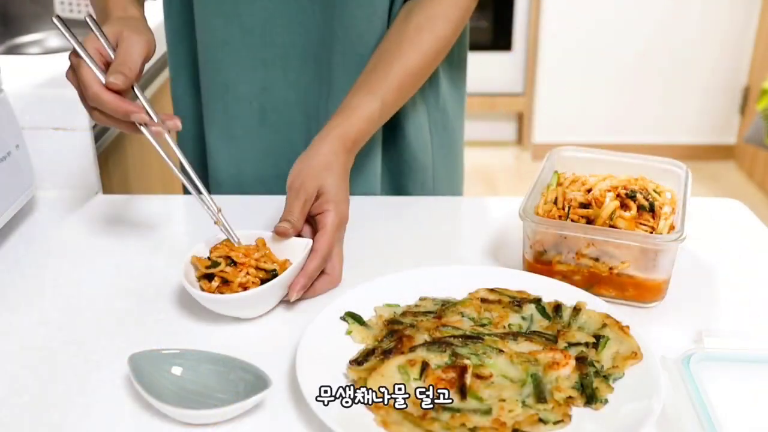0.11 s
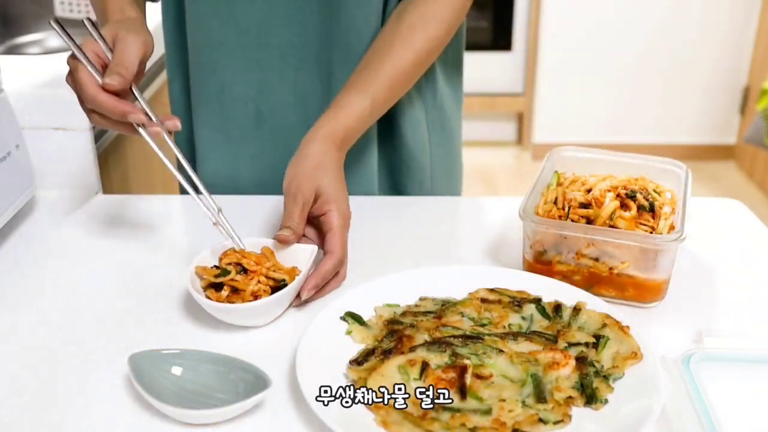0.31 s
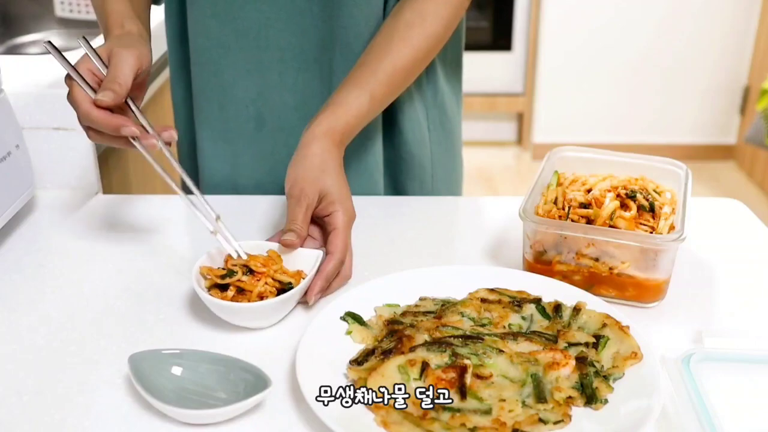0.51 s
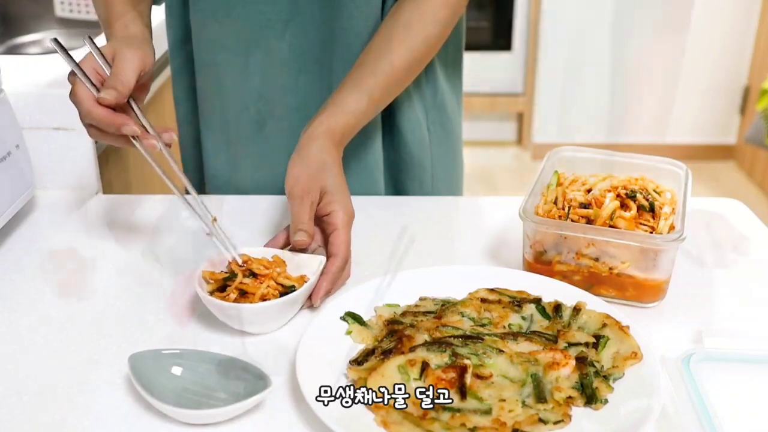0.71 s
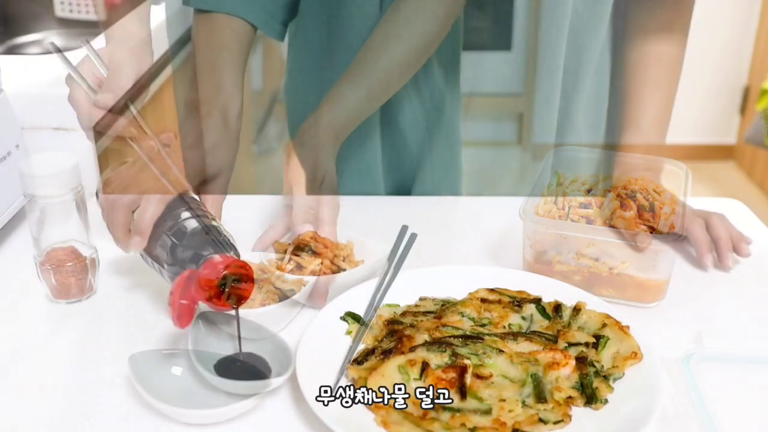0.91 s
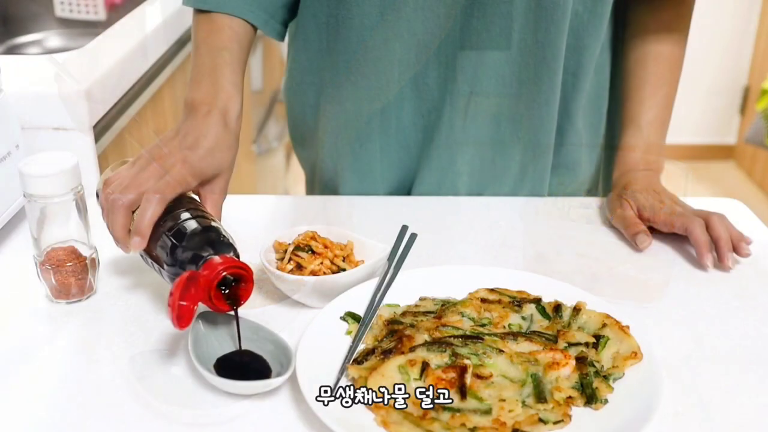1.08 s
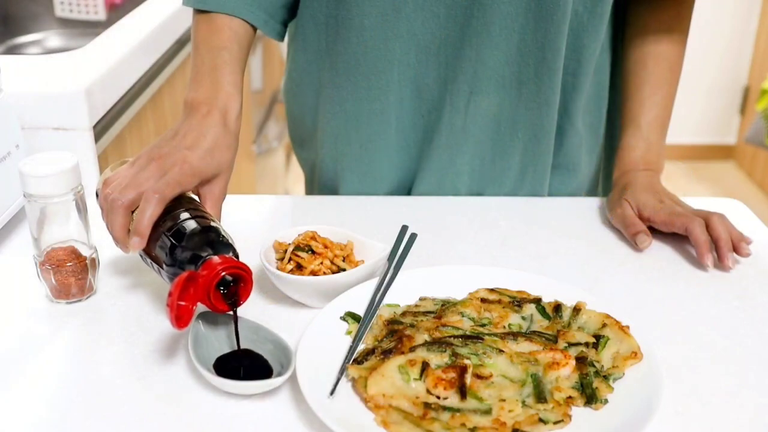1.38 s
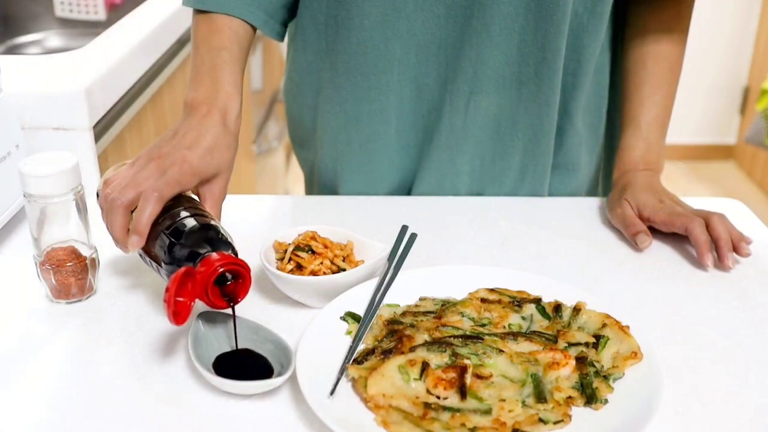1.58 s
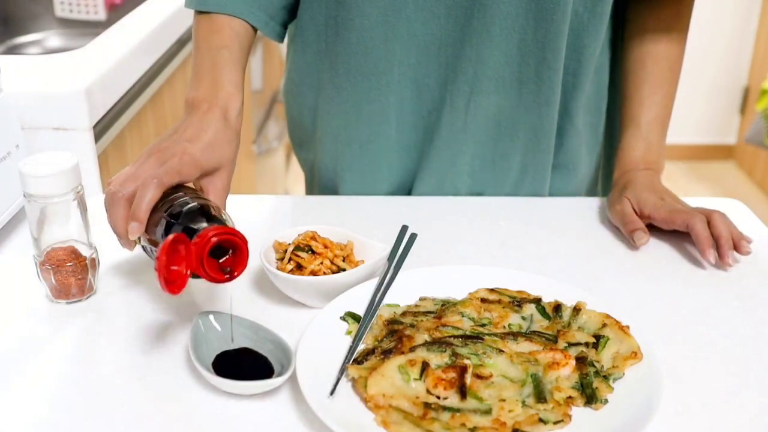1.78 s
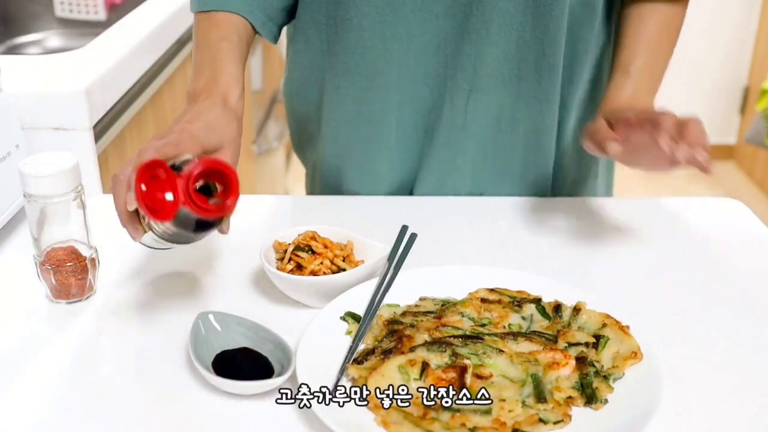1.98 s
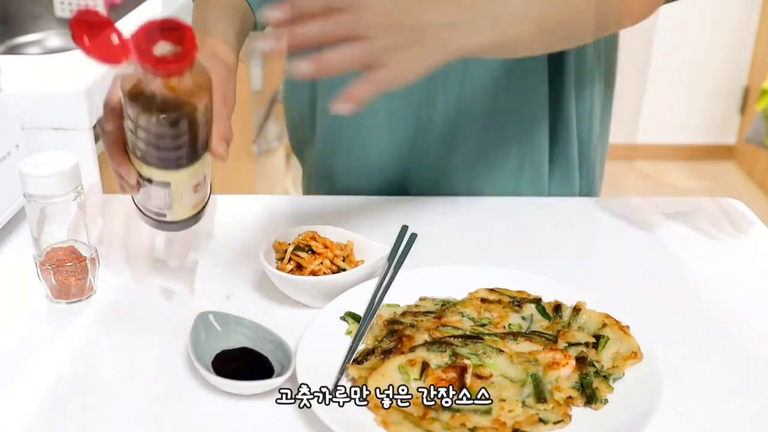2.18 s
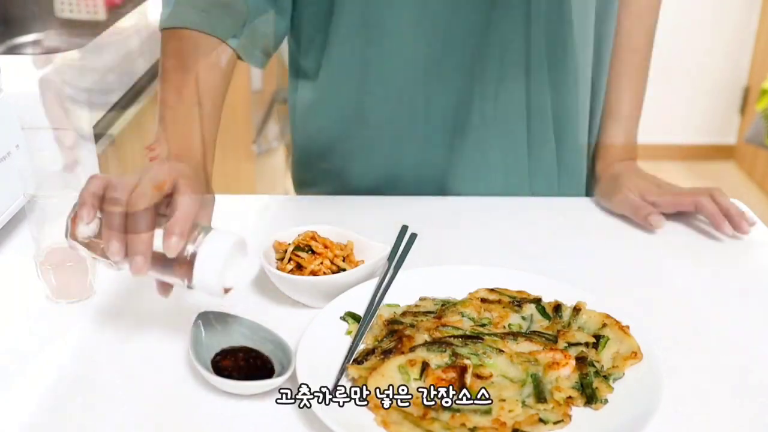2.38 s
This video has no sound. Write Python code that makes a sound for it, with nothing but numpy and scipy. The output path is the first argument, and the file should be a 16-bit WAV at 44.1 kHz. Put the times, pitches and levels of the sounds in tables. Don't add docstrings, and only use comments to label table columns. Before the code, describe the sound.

Loud, close plastic lid snap in a kitchen, followed by dish knocks and tiny bottle clinks.

```python
import sys
import numpy as np
from scipy import signal
from scipy.fft import rfft, irfft, next_fast_len
from scipy.io import wavfile
from scipy.ndimage import uniform_filter1d, map_coordinates

SR = 44100
rng = np.random.default_rng(int(sys.argv[2]) if len(sys.argv) > 2 else 0)


def voltage_ratio(decibels):
    exponent = np.asarray(decibels, float) / 20
    return 10 ** exponent


def file_out(sig):
    cols = np.atleast_2d(sig).T
    lim = np.clip(cols, -1, 1)
    pcm = np.round(lim * 32767).astype(np.int16)
    wavfile.write(sys.argv[1], SR, pcm)


N = 110250
TIME_S = np.arange(N) / SR


def unit(x):
    return x / np.sqrt(np.mean(x ** 2) + 1e-20)


def along(points, hz):
    point_hz, value = np.transpose(points)
    return np.interp(np.log(hz + 1), np.log(point_hz + 1), value)


def wobble(rate_hz):
    knots = rng.standard_normal(int(N * rate_hz / SR) + 4)
    return map_coordinates(knots, [np.arange(N) * rate_hz / SR])


def bandpass(x, order, edges_hz):
    return signal.lfilter(*signal.butter(order, np.array(edges_hz) / SR * 2, "band"), x)


def filtered(x, response):
    n = x.shape[-1]
    size = next_fast_len(n + SR // 4)
    gain = response(np.fft.rfftfreq(size, 1 / SR))
    return irfft(rfft(x, size) * gain, size)[..., :n]


def spread(pair, spectrum, alike):
    def mid_side_gain(hz):
        turn = np.arccos(np.clip(along(alike, hz), -1, 1)) / 2
        return voltage_ratio(along(spectrum, hz)) * [np.cos(turn), np.sin(turn)]

    mid, side = filtered(pair, mid_side_gain)
    return unit(np.array([mid + side, mid - side]))


def add(out, start_s, x):
    i = max(round(start_s * SR), 0)
    out[..., i:i + x.shape[-1]] += x[..., :N - i]


# start_s, level_db, left_right_db, brightness_db_per_octave
SNAPS = [
    (.2007, 3, 1, 2.5),
    (.2036, -3.5, 2, 1.5),
    (.2058, -17, 4, -1),
]
# pitch_hz, level_db, t60_s
LID = [(88, -16, 0.042), (214.6, -8.5, 0.21), (261, -12, 0.16), (770, -13, 0.03), (860, -15, 0.014),
       (940, -8, 0.041), (1155, -4.5, 0.023), (1300, -14, 0.035), (2003, 0, 0.0069), (2153, 3, 0.011),
       (2565, -3.5, 0.017), (2910, -2, 0.0071), (3240, -34, .015), (4300, -5, 0.0039)]
# freq_hz, level_db
LID_ECHO = [(45, -41), (90, 0), (250, -5), (400, -9), (750, -3.5), (1400, -5.5), (2100, -1), (3100, -14),
            (4200, -27.5), (5800, -35.5), (8000, -52), (12000, -73)]


def lid_snap():
    return blows(SNAPS, LID, LID_ECHO, crack_hz=5770, crack_db=4.5, crack_s=0.00063,
                 echo_db=17.5, ring_echo_db=-16, last=0.97)


# start_s, level_db, left_right_db, brightness_db_per_octave
KNOCKS = [(.612, -42, 7, -1), (.666, -32, 8, -5), (.6708, -19, -5, 4.5), (.6735, -15, 1, 0),
          (.6815, -23, 0.5, -3), (.6955, -31, 0, 1), (.8932, -35, 6, -5), (.8975, -28, 4, 6),
          (.8995, -20.5, -3, -2.5), (.9062, -33, 0, -1), (.942, -35, 0, -3)]
# pitch_hz, level_db, t60_s
DISH = [(253, -5.5, 0.053), (453, -4, 0.021), (603, -2, 0.04), (718, 3.5, 0.045), (840, -3.5, 0.039),
        (1328, -0.5, 0.054), (1570, -4, 0.034), (1800, -3, 0.029), (2034, 3.5, 0.015), (2175, -4.5, 0.037),
        (2690, -7.5, 0.027), (3050, -11.5, 0.021), (3400, -19, 0.014), (4800, -38, 0.039)]
# freq_hz, level_db
DISH_ECHO = [(100, -30), (250, -6), (480, -8), (730, -4), (1100, -6), (2200, -4), (2800, -9), (3600, -24),
             (9000, -50)]


def dish_knocks():
    return blows(KNOCKS, DISH, DISH_ECHO, crack_hz=3200, crack_db=-23, crack_s=0.0051,
                 echo_db=19, ring_echo_db=-24, last=0.62)


# freq_hz, level_db
WIDTH = [(100, -37), (500, -12.5), (1300, -8.5), (4000, 1), (12000, -13)]


def blows(contacts, modes, echo, crack_hz, crack_db, crack_s, echo_db, ring_echo_db, last):
    rise_s, left_lag_samples, low_cut_hz = 0.0006, 14, 232
    out, walls = np.zeros((2, N)), np.zeros((2, N))
    t = np.arange(SR // 5) / SR
    hz, level_db, t60 = np.transpose(modes)[:, :, None]
    for start_s, db, pan_db, bright_db in contacts:
        scatter_db, side_sign = rng.standard_normal((2, len(modes), 1))
        tilt_db = bright_db * np.log2(hz / 1200)
        decay = voltage_ratio(level_db + tilt_db + scatter_db - 60 * t / t60) * (1 - np.exp(-t / rise_s))
        mid = (decay * np.sin(2 * np.pi * hz * t)).sum(0)
        side_gain = voltage_ratio(along(WIDTH, hz)) * np.sign(side_sign)
        side = (decay * side_gain * np.cos(2 * np.pi * hz * t)).sum(0)
        ring = np.array([mid + side, mid - side])

        crack = rng.standard_normal(len(t)) * voltage_ratio(crack_db + 2 * bright_db - 60 * t / crack_s)
        crack = bandpass(crack, 2, [600, crack_hz])
        crack = np.array([np.roll(crack, left_lag_samples), crack])

        pan = voltage_ratio([[pan_db / 2], [-pan_db / 2]])
        add(out, start_s, voltage_ratio(db) * pan * (ring + crack))
        add(walls, start_s, voltage_ratio(db + echo_db) * kitchen(echo, last))
    out = signal.lfilter(*signal.butter(2, low_cut_hz / SR * 2, "high"), out)
    ring_echo = signal.fftconvolve(out[:1], kitchen(echo), axes=1)[:, :N]
    return out + walls + voltage_ratio(ring_echo_db) * ring_echo


# start_s, level_db, pitch_hz, t60_s, click_share
TICKS = [(1.843, -44, 9800, .012, .4), (1.9474, -32, 4800, 0.008, 0.35), (1.948, -36, 2900, .01, .3),
         (1.948, -45, 7200, .008, .6), (1.9487, -42, 10000, 0.017, 0.15), (1.976, -38, 4450, 0.014, 0.08),
         (1.9841, -33, 3200, 0.012, 0.1), (1.987, -33, 2600, 0.024, 0.05), (2.1731, -29, 2000, .02, .2),
         (2.1763, -26, 1895, 0.045, 0.05), (2.1745, -33, 2870, 0.016, 0.12), (2.1755, -48, 9500, .01, 0.7),
         (2.1745, -36, 5920, 0.025, 0.25), (2.1875, -45, 6000, .01, .1), (2.1948, -32, 4050, 0.015, .03),
         (2.1975, -30, 3970, .016, .02), (2.338, -46, 4600, 0.0069, .6), (2.338, -51, 10500, .008, .8),
         (2.338, -28, 290, 0.11, 0.014), (2.376, -37, 11000, 0.014, 0.3), (2.3765, -43, 8060, 0.015, .35)]
# freq_hz, level_db
TICK_ECHO = [(100, 3.5), (4000, -8), (12000, -4.5)]


def ticks():
    phase_rough, click_db, click_top_hz, echo_db = 0.055, 16, 12300, -8
    out = np.zeros((2, N))
    t = np.arange(SR // 8) / SR
    for start_s, db, hz, t60, click in TICKS:
        rough, noise = rng.standard_normal((2, 2, len(t)))
        ear_phase = [[0], [rough[1, 0] * min(hz / 2500, 3)]]
        phase = 2 * np.pi * hz * t + phase_rough * np.cumsum(rough[0]) + ear_phase
        ring = np.sin(phase) * voltage_ratio(-60 * t / t60) * (1 - np.exp(-t / 0.00052))
        edges_hz = np.minimum([hz * 0.57, hz * 1.2], [9000, click_top_hz])
        snap = bandpass(noise, 3, edges_hz)
        snap = snap * voltage_ratio(click_db - 60 * t / 0.02) * (1 - np.exp(-t / 0.00066))
        add(out, start_s, voltage_ratio(db) * ((1 - min(click, 1)) * ring + click * snap))
    echo = signal.fftconvolve(out[:1], kitchen(TICK_ECHO), axes=1)[:, :N]
    return out + voltage_ratio(echo_db) * echo


# start_s, length_s, first_hz, last_hz, level_db
SQUEAKS = [
    (0, .07, 12500, 13000, -62),
    (.02, 0.047, 11900, 11900, -67),
    (0.064, 0.065, 11100, 11450, -64),
    (0.11, 0.071, 13300, 12500, -68),
    (1.967, 0.18, 11400, 12500, -72),
    (1.952, 0.08, 10450, 10700, -64),
    (2.09, 0.093, 11100, 11300, -66),
]


def squeaks():
    phase_rough, flutter_db = 0.07, 4
    out = np.zeros(N)
    for start_s, length_s, first_hz, last_hz, db in SQUEAKS:
        u = np.linspace(0, 1, round(length_s * SR))
        glide_hz = first_hz + (last_hz - first_hz) * u
        scatter = phase_rough * np.cumsum(rng.standard_normal(len(u)))
        phase = 2 * np.pi * np.cumsum(glide_hz) / SR + scatter
        swell = np.sqrt(np.abs(np.sin(np.pi * u)))
        add(out, start_s, voltage_ratio(db) * swell * np.sin(phase))
    return out * voltage_ratio(flutter_db * wobble(90)) * voltage_ratio([[2], [-2]])


# freq_hz, t60_s
ROOM_T60 = [(100, 0.19), (500, 0.56), (1500, 0.51), (3000, 0.4), (6000, 0.65)]
# freq_hz, left_right_likeness
ROOM_ALIKE = [(60, 0.98), (180, 1), (550, 0.91), (1650, -0.063), (4970, -0.72), (15000, -1.2)]


def kitchen(colour, last=1):
    rise_s = 0.016
    hz, t, z = signal.stft(rng.standard_normal((2, SR * 3 // 5)), SR, nperseg=256)
    t60 = along(ROOM_T60, hz)[:, None] * last
    z = z * voltage_ratio(-60 * t / t60) * (1 - np.exp(-t / rise_s))
    tail = spread(signal.istft(z, SR, nperseg=256)[1], colour, ROOM_ALIKE)
    return tail / np.linalg.norm(tail[0])


# start_s, level_db
HUM = [(0, -47.5), (.2, -39.5), (.5, -41.5), (.68, -46), (.95, -45), (1.27, -37.5), (1.4, -42.5),
       (1.8, -46.5), (1.84, -50.5), (1.95, -46.5), (2.3, -48.5), (2.5, -41.5)]


def fridge_hum():
    hum_hz, width_hz, rough, sway = 162, 10, 0.45, 0.9
    noise = rng.standard_normal(N)
    narrow = filtered(noise, lambda hz: 1 / (1 + ((hz - hum_hz) / width_hz) ** 2))
    tone = np.sin(2 * np.pi * hum_hz * TIME_S + sway * wobble(4.23))
    level_db = np.interp(TIME_S, *np.transpose(HUM)) + 0.5
    return voltage_ratio(level_db) * unit(rough * unit(narrow) + tone)


# start_s, level_db
RUSH = [(0.0, -38.5), (0.22, -39.5), (0.81, -39), (0.92, -42), (1.75, -38), (2.23, -42), (2.5, -42)]
# freq_hz, level_db_per_hz
AIR = [(20, -21), (35, -10), (60, -8.5), (125, -15), (220, -9.5), (650, -12), (1300, -16.5), (3000, -28.5),
       (4500, -50)]
# freq_hz, left_right_likeness
AIR_ALIKE = [(60, 0.99), (150, 0.81), (380, 0.72), (950, 0.18), (2380, -0.5), (5980, -0.71), (15000, -0.59)]


def room_rush():
    z = signal.stft(rng.standard_normal((2, N)), nperseg=512)[2]
    patches = uniform_filter1d(rng.standard_normal(z.shape[1:]), 5, 0)
    patches = uniform_filter1d(patches, 10, 1)
    pair = signal.istft(z * voltage_ratio(1.13 * unit(patches)), nperseg=512)[1][:, :N]
    level_db = np.interp(TIME_S, *np.transpose(RUSH)) + 3 + 0.09 * wobble(6.2)
    return voltage_ratio(level_db) * spread(pair, AIR, AIR_ALIKE)


# freq_hz, level_db_per_hz
HISS = [(1500, -4.5), (3000, 1), (5000, -1), (8000, -9.5), (11200, -9.5), (12500, -15), (15500, -54),
        (16000, -56.5)]


def microphone_hiss():
    return voltage_ratio(-52) * spread(rng.standard_normal((2, N)), [(600, -60), *HISS], AIR_ALIKE)


def scene():
    near = lid_snap() + dish_knocks() + ticks() + squeaks()
    return near + fridge_hum() + room_rush() + microphone_hiss()


def top_cut(x):
    return signal.sosfilt(signal.butter(12, 16570, fs=SR, output="sos"), x)


def record(dry):
    duck_db, wait_s, fall_s, recovery_s = -5, 0.008, 0.008, 0.2
    knee, top_hz = 6, 16500
    since_s = TIME_S - SNAPS[0][0] - wait_s
    duck = duck_db * np.exp(-np.abs(since_s) / recovery_s) * np.tanh(since_s / fall_s)
    x = dry * voltage_ratio(np.where(since_s > 0, duck, 0))
    x = x / (1 + np.abs(x) ** knee) ** (1 / knee)
    x = filtered(x, lambda hz: hz < top_hz)
    return top_cut(x)


dry = scene()
out = record(dry)
file_out(out)
```